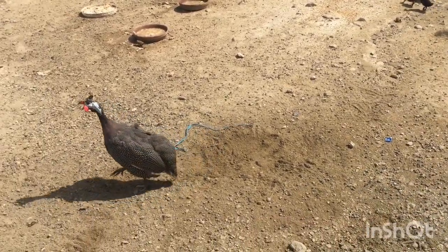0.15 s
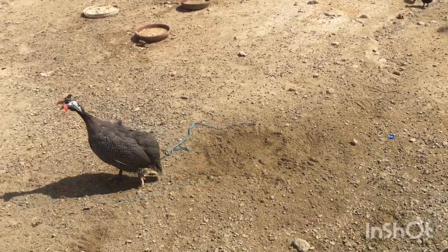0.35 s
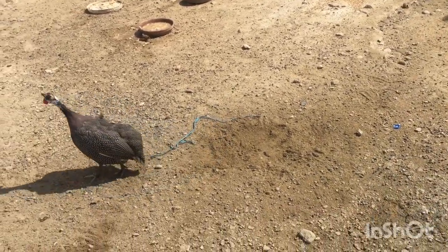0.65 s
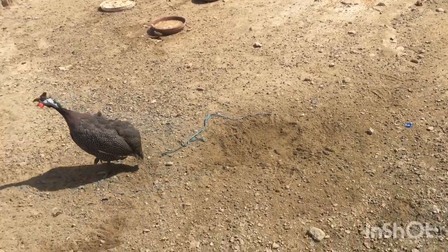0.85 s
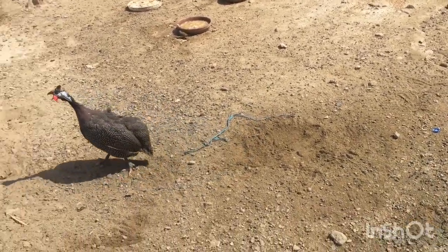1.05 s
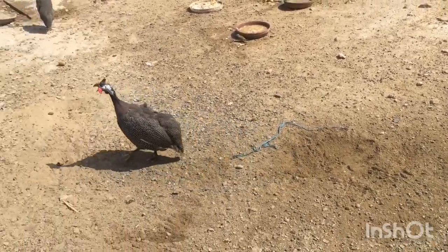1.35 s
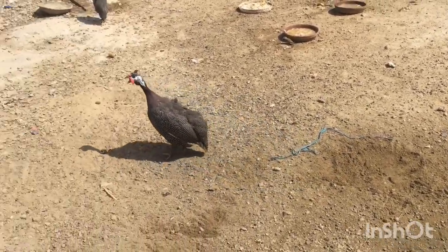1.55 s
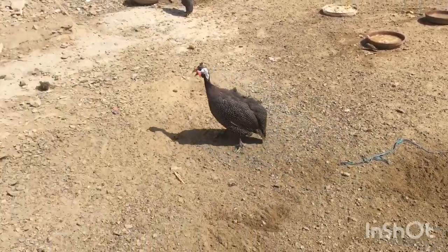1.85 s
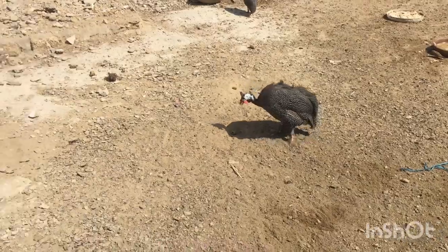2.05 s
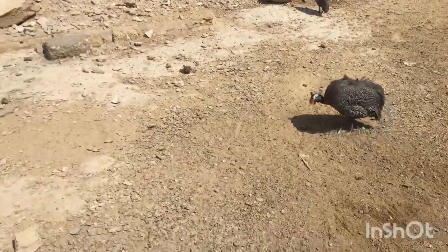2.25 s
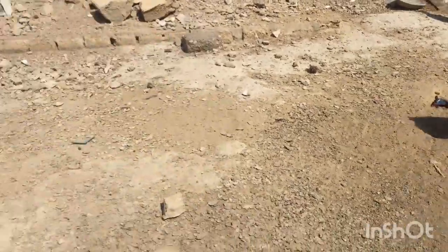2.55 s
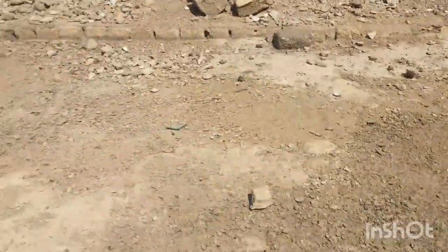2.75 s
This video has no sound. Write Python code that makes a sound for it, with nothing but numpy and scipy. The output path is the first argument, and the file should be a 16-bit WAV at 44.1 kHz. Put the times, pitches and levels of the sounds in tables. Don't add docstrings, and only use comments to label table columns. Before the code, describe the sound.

A guineafowl close by gives a fast, even run of harsh raspy calls echoing off yard walls, then small clucks; afterwards faint birdsong, crunching grit and knocking pebbles over a low distant rumble.

```python
import sys
import numpy as np
from scipy import signal
from scipy.fft import rfft, irfft
from scipy.io import wavfile
from scipy.ndimage import uniform_filter1d, minimum_filter1d

SR = 44100
rng = np.random.default_rng(int(sys.argv[2]) if len(sys.argv) > 2 else 0)


def to_linear_factor(level_db):
    exponent = np.asarray(level_db, float) / 20
    return 10 ** exponent


def generate_wav(sig):
    pcm = np.round(np.clip(np.atleast_2d(sig).T, -1, 1) * 32767).astype(np.int16)
    wavfile.write(sys.argv[1], SR, pcm)


N = 127890
LEAD_IN_S = 0.5


def evened(x):
    return x / np.sqrt(np.mean(x ** 2) + 1e-20)


def read(points, hz):
    f, value = np.transpose(points)
    return np.interp(np.log(hz + 1), np.log(f + 1), value)


def add(mix, s, sound):
    at = round(s * SR)
    part = mix[max(at, 0):][:len(sound) + min(at, 0)]
    part += sound[max(-at, 0):][:len(part)]


def progress(length):
    return np.arange(0, length, 1 / SR) / length


def resonate(x, hz, width):
    turn = np.exp(2j * np.pi * np.cumsum(hz * np.ones(len(x))) / SR)
    r = np.exp(-np.pi * width / SR)
    once = signal.lfilter([1 - r], [1, -r], x / turn + 1e-18)
    return 2 * (turn * signal.lfilter([1 - r], [1, -r], once)).real


def slow(noise, rate_hz):
    size = max(int(SR / rate_hz), 2)
    return evened(uniform_filter1d(uniform_filter1d(noise, size), size))


def filtered(x, order, hz, kind):
    return signal.lfilter(*signal.butter(order, hz, kind, fs=SR), x)


def voice_box(turns, t, a, b):
    rough, shimmer, smear = 0.33, 0.22, 0.16
    halves = 1 + (0.12 + 0.4 * np.exp(-t / 0.02)) * np.cos(np.pi * turns)
    folds = sum(np.cos(2 * np.pi * k * turns + smear * k ** 2) for k in range(2, 36))
    folds = evened(folds * (1 + shimmer * slow(a, 380)) * halves)
    puffs = (0.8 + np.exp(-(turns % 1) / 0.33)) * b
    return folds, (1 - rough) * folds + rough * evened(puffs)


def call(start, length, effort_db, pitch_hz, low_hz):
    # t/s, windpipe level/dB, lower throat level/dB, beak level/dB, open beak f/Hz
    head = [(-0.05, -20, -3, 0, 5030), (0.08, -26.5, -2, 0, 5260), (0.22, -17, -2, 1, 5310),
            (0.36, -18.5, -1.5, 0.5, 5250), (0.5, -18, -3.5, 2, 5110), (0.641, -14.5, -1.5, -0.5, 4920),
            (0.8, -17, -1.5, -1, 4934), (0.98, -15, -2, -2, 4970), (1.13, -18, -3, -1.5, 5010),
            (1.29, -11, 2, 2.5, 5000), (1.44, -11.5, 0.5, 2.5, 5170), (1.58, -12, -3, 1, 5020),
            (1.75, -9.5, -1.5, 2, 5270), (1.89, -12.5, -3, -0.5, 4960)]
    # t/s, palate level/dB, hiss level/dB
    facing = [(-0.05, -1, -1), (0.08, -2.5, -3), (0.22, 0.5, 0), (0.36, 0, -0.5), (0.5, 0.5, 0),
              (0.64, 2, -1.5), (0.8, 0.5, 0), (0.98, 0, -2.5), (1.13, 0, -2.5), (1.29, 3.5, 2),
              (1.44, 2.5, 2), (1.58, 1.5, 1.5), (1.75, 2.5, 2), (1.89, 0, -2)]
    # f/Hz, level/dB
    hollows = [(2955, -21), (3324, -11), (4014, -10.5), (6150, -11), (6986, -15.5), (8950, -22),
               (11840, -24.5), (10100, -27), (12940, -30.5), (15300, -32.5)]
    # share of the open beak pitch, level/dB
    beak_hollows = [(.86, -5.5), (1.002, -4.5), (1.082, -1)]
    # multiple of the pitch, level under the call/dB
    low_partials = [(1, -38), (2, -31), (3, -38)]
    fall_s, throb_db = 0.026, 1.6
    a, b, c, d = rng.standard_normal((4, 8000))

    when, *pose = np.transpose(head)
    neck_db, low_db, beak_db, beak_hz = (np.interp(start, when, p) for p in pose)
    when, *aim = np.transpose(facing)
    palate_db, hiss_db = (np.interp(start, when, p) for p in aim)

    t, hold = np.arange(8000) / SR, length - 0.02
    u = np.minimum(t / hold, 1.3)
    hz = pitch_hz * (1 + 0.03 * np.sin(np.pi * np.minimum(u, 1)) - 0.085 * u ** 5)
    steady = np.cumsum(hz) / SR
    jitter = 0.019 * (slow(a, 422) + 0.656 * slow(b, 66.8))
    turns = steady + np.cumsum(hz * jitter) / SR
    folds, drive = voice_box(turns, t, b, c)

    beak = (0.68 + 0.32 * np.tanh(t / 0.017)) * (1 - 0.11 * u ** 3)
    gape = np.tanh(t / 0.01) * to_linear_factor(-20 * np.maximum(t - hold + 0.013, 0) / (3 * fall_s))

    lower = evened(resonate(drive + 0.6 * folds, low_hz * (1 - 0.018 * u ** 3), 380))
    throat = to_linear_factor(low_db + throb_db * slow(d[::-1], 250)) * lower
    windpipe = evened(resonate(0.033 * drive + folds, 1563, 400))
    throat -= to_linear_factor(neck_db) * windpipe

    resonances = []
    for f, db in hollows:
        turned_db = hiss_db if f > 8000 else palate_db if f > 6000 else 0
        resonances.append((f, db + turned_db, beak ** 0.38))
    for share, db in beak_hollows:
        resonances.append((share * beak_hz, db + beak_db, beak))
    resonances.sort(key=lambda row: row[0])
    for k, (f, db, lift) in enumerate(resonances):
        wander = 1 + 0.022 * slow(np.roll(d, 800 * k), 6.8)
        width = f * 0.085 * (1 + 0.87 * (f > 8000))
        ring = evened(resonate(drive, f * lift * wander, width))
        throb = to_linear_factor(db + throb_db * slow(np.roll(d, 500 * k), 260))
        throat -= (-1) ** k * gape * throb * ring
    throat = signal.sosfilter(signal.butter(4, 1050, "high", fs=SR, output="sos"), throat) \
        if hasattr(signal, "sosfilter") else \
        signal.sosfilt(signal.butter(4, 1050, "high", fs=SR, output="sos"), throat)

    hum = np.zeros(len(t))
    for k, db in low_partials + [(3.7, neck_db - 11)]:
        hum += to_linear_factor(db) * np.sqrt(2) * np.sin(2 * np.pi * k * (0.7 * steady + 0.3 * turns) + k)
    hum *= 1 + 0.3 * slow(a[::-1], 320)

    rise = np.sin(np.pi / 2 * np.minimum(t / 0.016, 1)) ** 2
    shape = rise * to_linear_factor(-1.5 * u - 20 * np.maximum(t - hold, 0) / fall_s)
    sac = to_linear_factor(-24.5) * resonate(shape * np.sin(2 * np.pi * steady), 1.015 * pitch_hz, 21)
    return start + 0.003, to_linear_factor(effort_db + 0.65) * (shape * (evened(throat) + hum) + sac)


def calling():
    # t/s, length/s, effort level/dB, pitch f/Hz, lower throat f/Hz
    under_way = [
        (-0.048, .085, -15, 380, 2280),
    ]
    # t/s, length/s, effort level/dB, pitch f/Hz, lower throat f/Hz
    run = [(0.081, 0.074, -12.5, 411, 2254), (0.22, 0.084, -14, 422.8, 2280),
           (0.363, 0.079, -13, 409.7, 2300), (0.505, 0.082, -15.5, 415, 2270),
           (0.644, 0.092, -13, 438.5, 2290), (0.803, 0.11, -13, 429.3, 2304),
           (0.982, 0.085, -12.5, 438.3, 2325), (1.134, 0.087, -14.5, 401.2, 2300),
           (1.288, 0.086, -14.5, 404, 2295), (1.436, 0.093, -14.5, 406, 2334),
           (1.581, 0.095, -14.5, 404, 2330), (1.746, 0.084, -16.5, 402.4, 2360),
           (1.895, 0.076, -17, 411.6, 2340)]
    out = np.zeros(N + SR // 2)
    for row in under_way + run:
        s, sound = call(*row)
        add(out, s + LEAD_IN_S, sound)
    add(out, 0, out[round(0.58 * SR):round(1.01 * SR)].copy())
    return out


def clucks():
    # t/s, length/s, f/Hz, glide/Hz, level/dB
    notes_sung = [(2.072, 0.024, 1391, 32, -24), (2.083, 0.029, 1490, 30, -38),
                  (2.07, 0.015, 3370, -3.5, -34.5), (2.077, 0.013, 2770, 3, -36.5),
                  (2.087, 0.0135, 4870, -900, -30.5), (2.092, 0.018, 3900, 698, -32),
                  (2.098, 0.0051, 2600, 0, -36), (2.116, 0.0068, 4700, 0, -41),
                  (2.121, 0.011, 4360, 0, -42), (2.087, 0.0136, 9600, -1200, -56),
                  (2.091, 0.0135, 8300, 1100, -48.5), (2.076, 0.011, 5970, 698, -43.5),
                  (2.114, 0.0077, 3150, 50, -26), (2.115, .014, 1378, -5, -26),
                  (2.117, 0.011, 1880, 0, -36), (2.118, 0.0096, 2730, 0, -38),
                  (2.235, 0.0056, 3300, 95.5, -33.5), (2.236, 0.009, 1350, -5, -47)]
    out = np.zeros(N + SR // 2)
    for start, length, hz, glide_hz, db in notes_sung:
        u = progress(length)
        tone = np.sqrt(2) * np.sin(2 * np.pi * np.cumsum(hz + glide_hz * u) / SR)
        add(out, start + LEAD_IN_S, to_linear_factor(db) * np.sin(np.pi * u ** 0.87) ** 2 * tone)
    return out


def yard(x):
    # f/Hz, time to fall by 60 dB/s
    dying = [(400, 0.8), (1000, 1), (2200, 0.79), (5000, 0.84), (7000, 0.86), (8500, 0.54), (14000, 0.52)]
    # delay t/s, level/dB
    slaps = [
        (.0035, -24.5),
        (.011, -22),
        (.027, -27.5),
        (.043, -24.5),
    ]
    taps = np.zeros(SR)
    at = np.arange(0, SR - 20, 20) + rng.integers(0, 20, SR // 20 - 1)
    taps[at] = rng.choice([-1., 1.], len(at))
    hz, t, z = signal.stft(taps, SR, nperseg=256)
    tail = signal.istft(z * to_linear_factor(-60 * t / read(dying, hz)[:, None]), SR, nperseg=256)[1]
    tail = np.r_[np.zeros(int(0.011 * SR)), to_linear_factor(-18) * tail / np.linalg.norm(tail)]
    for k, (s, db) in enumerate(slaps):
        tail[int(s * SR)] += (-1) ** k * to_linear_factor(db)
    thin = 0.41 * x + filtered(x, 2, 930, "high") + to_linear_factor(6.5) * filtered(x, 2, 8630, "high")
    return signal.fftconvolve(thin, tail)[:len(x)]


def steps():
    # t/s, length/s, level/dB, dull share 0-1
    treads = [(2.411, 0.0065, -63, 0.2), (2.422, 0.018, -50.5, 0.22), (2.443, 0.0069, -68.5, 0),
              (2.55, 0.0035, -86, 0.04), (2.587, 0.02, -49, 0.63), (2.573, 0.074, -61, 0.4),
              (2.65, .008, -64, 0.18), (2.698, 0.135, -59.5, 0.54), (2.786, 0.0028, -46.5, 0.7),
              (2.81, 0.11, -51.5, 0.26), (2.845, 0.035, -51, 0.1)]
    # f/Hz, level per Hz/dB
    grit = [(350, -31), (600, -10), (1390, -6), (4030, -8.5), (4680, -7), (5150, -9.5), (12000, -18),
            (15500, -18.5)]
    grains_per_s, dull_hz = 810, 2600
    out = np.zeros(N)
    for start, length, db, dull in treads:
        chance = rng.random(6000)
        size, hiss = rng.standard_normal((2, 6000))
        u = progress(length)
        grains = evened((chance < grains_per_s / SR) * size + 0.00086 * hiss) + 0.79 * hiss
        grains = (1 - dull) * grains + dull * evened(filtered(grains, 2, dull_hz, "low"))
        add(out, start, to_linear_factor(db) * np.sin(np.pi * u ** 0.63) * grains[:len(u)])
    colour = to_linear_factor(read(grit, np.fft.rfftfreq(N, 1 / SR)))
    return irfft(rfft(out) * evened(colour), N)


def pebbles():
    # t/s, length/s, f/Hz, width/Hz, level/dB
    knocks = [
        (2.412, 0.033, 2650, 500, -53),
        (2.416, 0.02, 5200, 1600, -56.5),
        (2.589, .012, 1340, 430, -52),
        (2.592, 0.018, 2260, 500, -53),
        (2.65, 0.01, 5700, 1200, -70),
        (2.782, .006, 4100, 900, -62),
        (2.857, .02, 1300, 400, -54),
        (2.9, .014, 1310, 120, -60),
        (2.09, 0.045, 4500, 1500, -49),
        (2.12, .012, 15000, 4500, -64.5),
    ]
    out = np.zeros(N)
    for start, length, hz, width_hz, db in knocks:
        u = progress(length)
        rattle = evened(resonate(rng.standard_normal(2000), hz, width_hz))
        add(out, start, to_linear_factor(db) * np.sin(np.pi * u ** 0.7) * rattle[:len(u)])
    return out


def songbirds():
    # t/s, length/s, f/Hz, glide/Hz, level/dB
    glides = [
        (2.31, .34, 3770, -60, -59),
        (2.30, .22, 3570, -40, -61),
        (2.36, .1, 6500, -50, -66),
        (2.19, .12, 6550, -100, -59),
        (2.2, .1, 6100, 300, -62),
        (2.21, .16, 5300, -200, -63),
        (2.825, .035, 4300, 600, -59),
        (2.865, .035, 4600, 300, -57),
    ]
    # t/s, length/s, f/Hz, arch height/Hz, level/dB
    arches = [
        (2.315, .065, 2150, 750, -59),
        (2.61, .07, 2200, 450, -65),
        (2.72, .06, 2400, 650, -62),
        (2.765, .035, 2700, 350, -64),
    ]
    out = np.zeros(N)
    for rows, arched in ((glides, False), (arches, True)):
        for start, length, hz, bend_hz, db in rows:
            u = progress(length)
            pitch = hz + bend_hz * (np.sin(np.pi * u) if arched else u)
            whistle = evened(resonate(rng.standard_normal(len(u)), pitch, 130))
            add(out, start, to_linear_factor(db) * np.sin(np.pi * u ** 0.8) ** 0.5 * whistle)
    return out


def air():
    # f/Hz, level per Hz/dB
    colour = [(22, -31.5), (45, -12.5), (80, 3.5), (230, -5), (560, -18.5), (3200, -32), (4200, -39),
              (15500, -54.5)]
    frames, hz = N // 256 + 5, np.fft.rfftfreq(1024, 1 / SR)
    a, b, patches = rng.standard_normal((frames, 513, 3)).T
    patches = evened(uniform_filter1d(uniform_filter1d(patches, 8, 0), 14, 1))
    z = (a + 1j * b) * to_linear_factor(read(colour, hz)[:, None] + 1.22 * patches)
    return to_linear_factor(-45) * evened(signal.istft(z, nperseg=1024, noverlap=768)[1][:N])


def scene():
    bird, soft = calling(), clucks()
    echo = yard(bird + to_linear_factor(-4) * soft)
    near = (bird + soft + echo)[SR // 2:]
    return (near + songbirds() + steps() + air() + pebbles())[None]


def roll_off(x):
    return signal.sosfilt(signal.butter(12, 15680, fs=SR, output="sos"), x)


def record(dry):
    power_db = 10 * np.log10(abs(uniform_filter1d(dry[0] ** 2, 2000)) + 1e-12)
    fall = np.arange(N) * 50 / SR
    over_db = np.maximum(np.maximum.accumulate(power_db + fall) - fall + 38, 0)
    ducked = dry * to_linear_factor(1.5 - 0.12 * uniform_filter1d(over_db, size=1200))
    ceiling = 0.63
    room = minimum_filter1d(np.minimum(ceiling / (abs(ducked) + 1e-9), 1), size=131)
    held = ducked * uniform_filter1d(room, size=131)
    treble_cut = signal.firwin(1023, 15640, window=("kaiser", 9), fs=SR)
    held = signal.oaconvolve(held, treble_cut[None], "same")
    return roll_off(held)


dry = scene()
out = record(dry)
generate_wav(out)
```